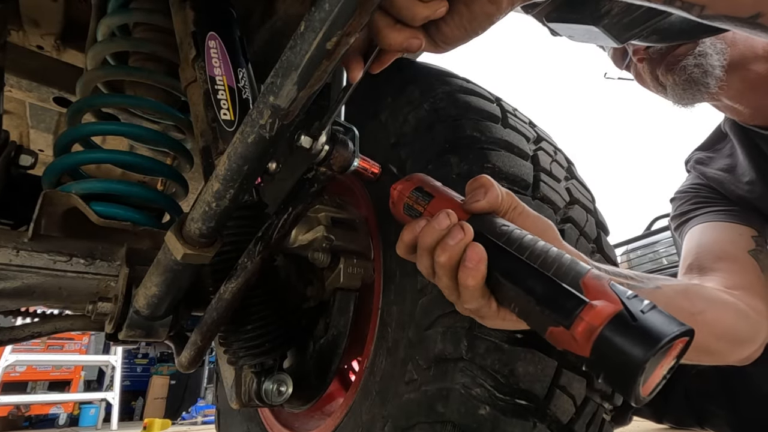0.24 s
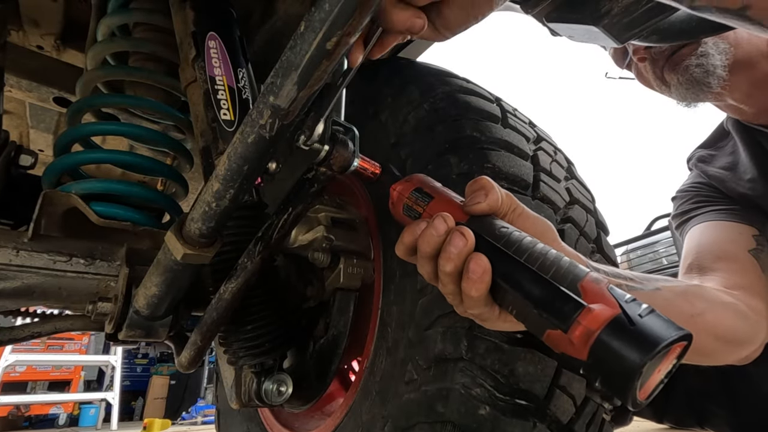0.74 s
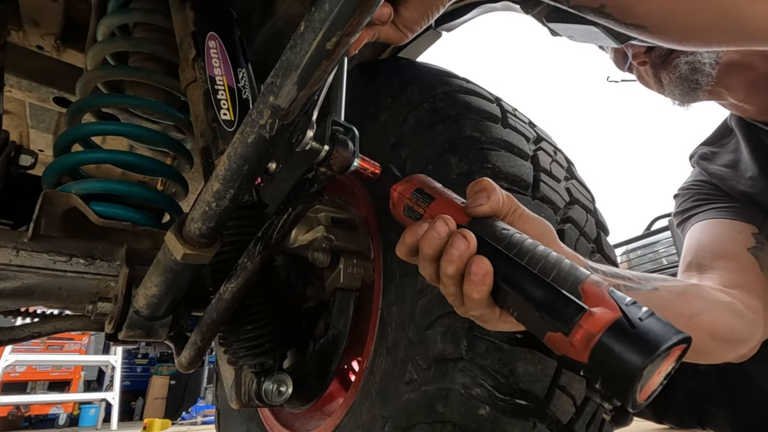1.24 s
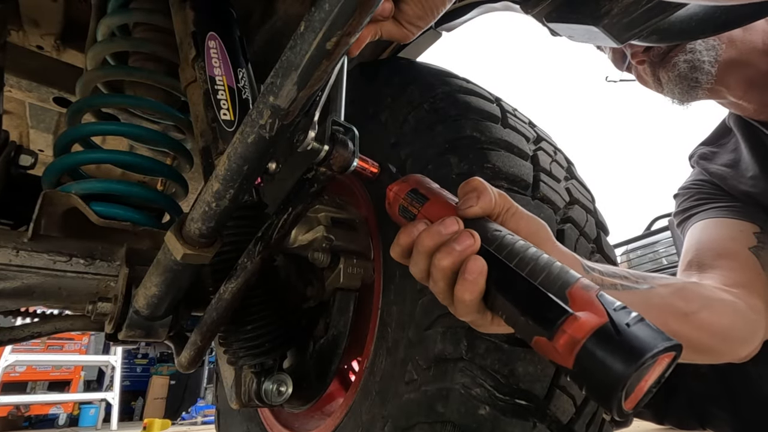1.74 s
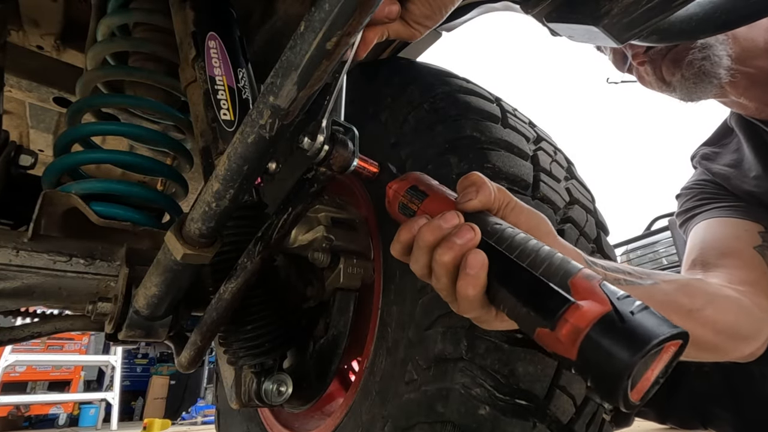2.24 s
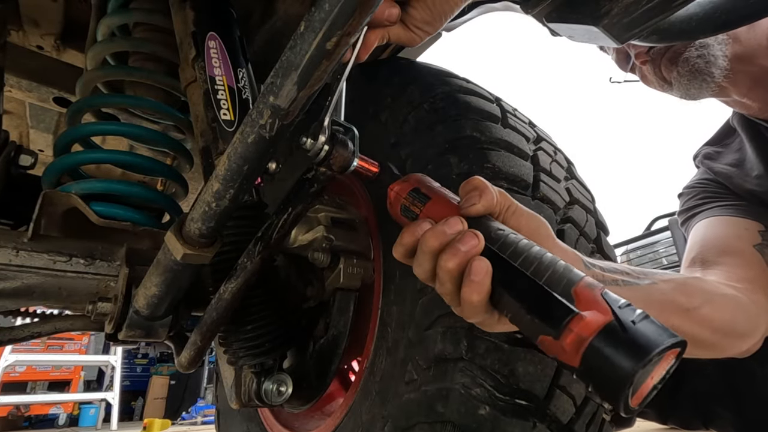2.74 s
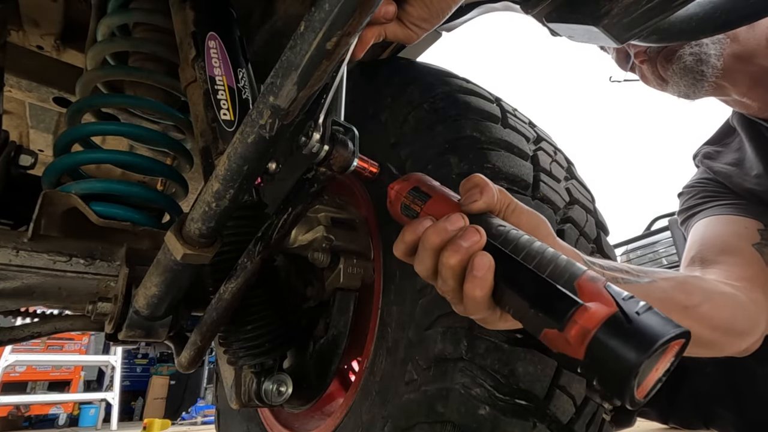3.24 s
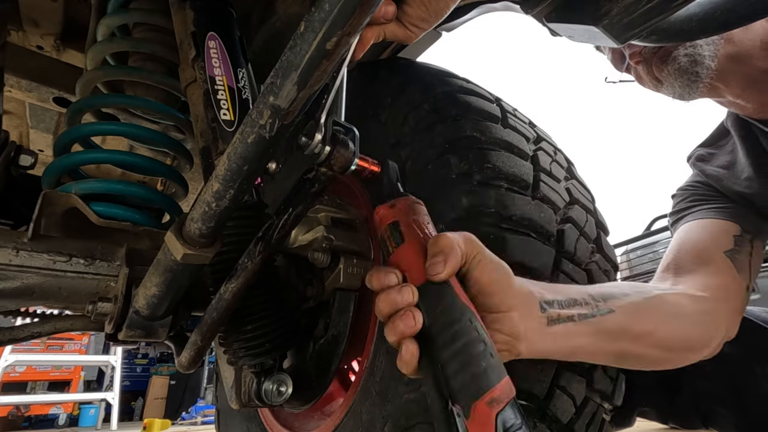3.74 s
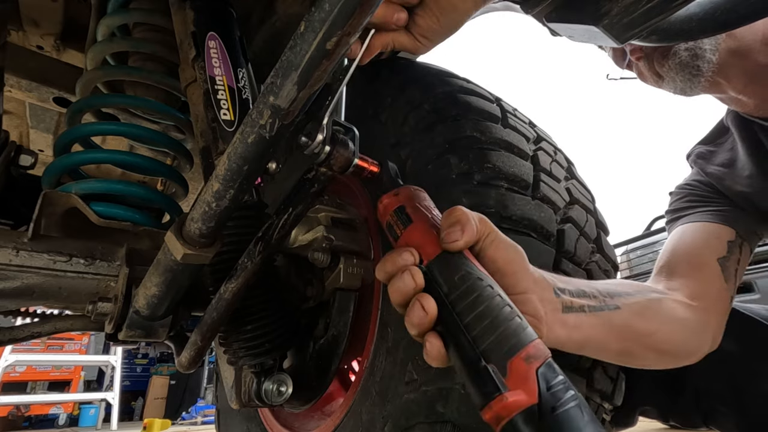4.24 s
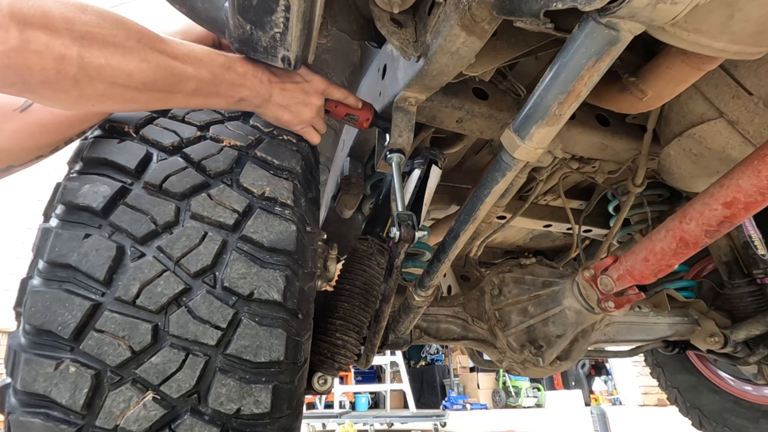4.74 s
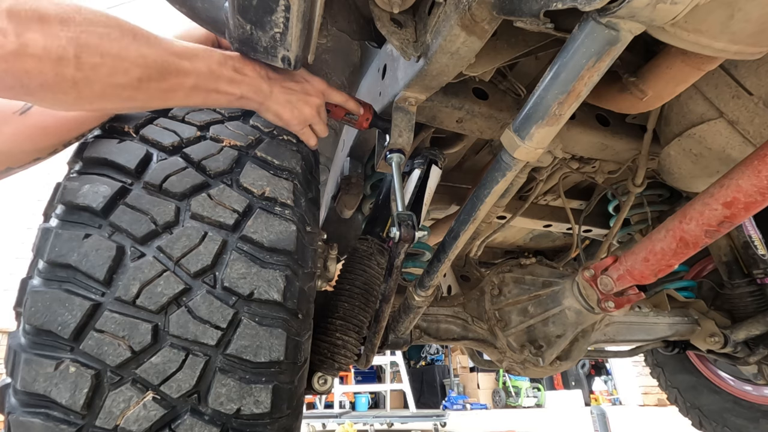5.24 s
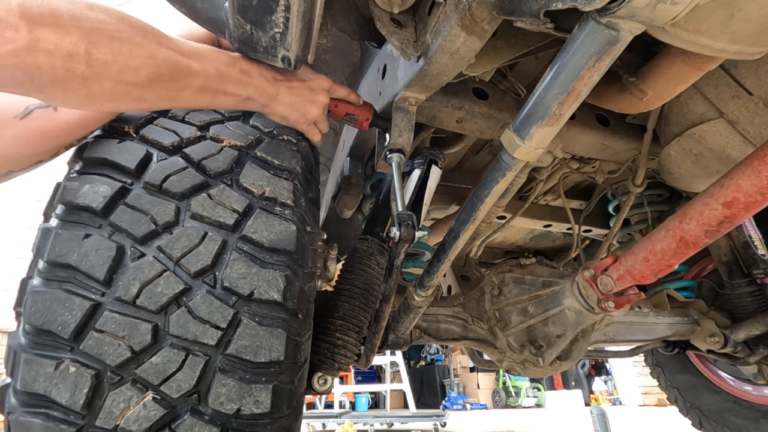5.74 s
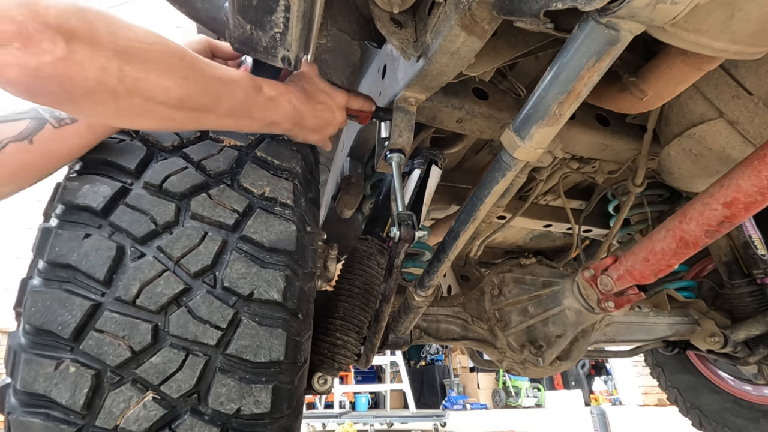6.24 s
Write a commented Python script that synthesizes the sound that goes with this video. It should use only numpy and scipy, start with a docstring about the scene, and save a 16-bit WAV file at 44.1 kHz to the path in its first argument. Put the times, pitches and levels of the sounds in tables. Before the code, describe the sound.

Under a truck, very close, a cordless ratchet already running slows into separate metallic clacks and stops. After a few steel knocks and a scuff it runs long and fast, a buzzing rattle with scraping and ringing, then groans down as the nut tightens. Wind buffets the microphone. The position then changes: an idling engine hums, steel ticks, and a short, rougher run binds and stops.

```python
"""Cordless ratchet under a truck

Close up, an electric ratchet runs nuts down: the first run eases off, the next two slow as the nut comes tight.
Each crank turn strikes a pawl, so timed blows ring through coloured noise; the gears rasp in between.
The socket knocks, scrapes and scuffs on steel, as short noise bursts, resonant noise and wavering tones.
Noise rumbles as wind on the microphone; after a change of position an engine idles some way off,
built from low firing orders, faint whines and a wash of air."""
import sys
import numpy as np
from scipy import signal
from scipy.fft import rfft, irfft, next_fast_len
from scipy.io import wavfile
from scipy.ndimage import uniform_filter1d, map_coordinates

SR = 44100
rng = np.random.default_rng(int(sys.argv[2]) if len(sys.argv) > 2 else 0)


def generate_wav(signal):
    """Clip the signal to [-1, 1] and save it as 16-bit WAV at the path in sys.argv[1]."""
    frames = np.transpose(np.atleast_2d(signal))
    scaled = np.clip(frames, -1, 1) * 32767
    pcm = np.round(scaled).astype(np.int16)
    wavfile.write(sys.argv[1], SR, pcm)


N = 285960
TIME = np.arange(N) / SR
FREE_TURNS = 73  # reference crank speed with no load, turns a second

# crank in the long run: [t/s, speed/turns a second, load of the nut/0-1]
LONG_DRIVE = [(1.57, 34, 0), (1.66, 70, 0), (1.85, 73.7, 0), (3.03, 72.6, 0), (3.45, 70.5, .02),
              (3.56, 57.6, .48), (3.66, 58, .55), (3.76, 40.4, .85), (3.87, 21, .35)]
# the long run: [trigger pulled t/s, last clack t/s, released t/s, gear level/dB at free speed without load,
# drift/dB a second, unloaded chassis growl/dB rel gear, unloaded steel rasp/dB rel gear at free speed]
LONG_RUN = (1.575, 3.838, 3.845, -24, -1.5, -8.8, -8)


def amp(db):
    """Decibels to gain."""
    return 10 ** (np.asarray(db) / 20)


def unit(x):
    """Scaled to rms 1."""
    return x / np.sqrt(np.mean(x ** 2) + 1e-20)


def along(points, hz):
    """Values at hz, read between (f/Hz, value) points on a log frequency axis."""
    f, v = np.transpose(points)
    return np.interp(np.log(hz + 1), np.log(f + 1), v)


def curves(rows):
    """One value per sample for each column after the time."""
    s, *cols = np.transpose(rows)
    return [np.interp(TIME, s, c) for c in cols]


def wobble(rate):
    """A smooth random curve, rate knots a second."""
    coarse = TIME[::32]
    knots = rng.standard_normal(int(N * rate / SR) + 4)
    return np.interp(TIME, coarse, map_coordinates(knots, [coarse * rate]))


def filtered(x, gain):
    """x through a causal minimum-phase filter with the given gain over frequency."""
    n = x.shape[-1]
    m = 2 * next_fast_len(n // 2 + 4096)
    log_gain = np.log(np.maximum(gain(np.fft.rfftfreq(m, 1 / SR)), 1e-6))
    # folding the cepstrum onto positive times makes the filter causal
    cepstrum = irfft(log_gain, m)
    cepstrum[1:m // 2] *= 2
    cepstrum[m // 2 + 1:] = 0
    return irfft(rfft(x, m) * np.exp(rfft(cepstrum)), m)[..., :n]


def zero_phase(x, response):
    """x times a response of frequency."""
    m = next_fast_len(N + SR // 2)
    return irfft(rfft(x, m) * response(np.fft.rfftfreq(m, 1 / SR)), m)[..., :N]


def noise(spectrum):
    """Coloured noise of rms 1."""
    return unit(filtered(rng.standard_normal(N), lambda hz: amp(along(spectrum, hz))))


def narrow(centre_hz, width_hz):
    """Noise of rms 1 ringing in one resonance."""
    gain = lambda f: 1 / (1 + (2 * (f - centre_hz) / width_hz) ** 4)
    return unit(filtered(rng.standard_normal(N), gain))


def steady(x):
    """x with its slow level evened out to about 1, single blows kept."""
    power = uniform_filter1d(uniform_filter1d(x ** 2, size=3000), size=2000)
    return x / np.sqrt(abs(power) + 1e-4 * np.mean(x ** 2))


def shifting(x):
    """x with its colour varied at random in short-lived patches of time and frequency."""
    patch_db = 1.5
    z = signal.stft(x, nperseg=256)[2]
    field = uniform_filter1d(rng.standard_normal(z.shape), size=7, axis=0)
    field = uniform_filter1d(field, size=6, axis=1)
    return signal.istft(z * amp(patch_db * unit(field)), nperseg=256)[1][:len(x)]


def stroke(middle_s, length_s):
    """Gain that swells smoothly to 1 and dies away."""
    return np.cos(np.pi * np.clip((TIME - middle_s) / length_s, -.5, .5)) ** 2


def swell(peak_s, rise_db, fall_db):
    """Gain that rises to 1 and falls again, at so many dB a second."""
    return amp(np.minimum(rise_db * (TIME - peak_s), fall_db * (peak_s - TIME)))


def resonances(modes, hz):
    """Gain of a set of resonances, given as (f/Hz, width/Hz, level/dB)."""
    return amp(sum(db / (1 + (2 * (hz - centre) / width) ** 2) for centre, width, db in modes))


def parts(x, colour, modes):
    """What chassis (low), gear case (middle) and bare steel (high) radiate when x shakes them."""
    below = lambda hz, edge: 1 / (1 + (hz / edge) ** 12)
    low = lambda hz: below(hz, 700)
    middle = lambda hz: below(hz, 3700) - below(hz, 700)
    high = lambda hz: 1 - below(hz, 3700)
    radiated = lambda hz, share: np.sqrt(abs(share(hz))) * amp(along(colour, hz)) * resonances(modes, hz)
    return [filtered(x, lambda hz: radiated(hz, share)) for share in (low, middle, high)]


def wind():
    """Buffeting on the microphone, with a higher flutter in the gusts, over quiet open air."""
    # wind on the microphone: [t/s, buffet level/dB, flutter level/dB before its trim]
    gusts = [(0, -21.5, -29.0), (0.17, -20.5, -26.0), (0.47, -22.0, -36.5), (0.53, -25.5, -26.0),
             (0.69, -28.5, -40.5), (1.06, -30.5, -34.0), (1.13, -36.0, -49.0), (1.29, -31.0, -41.0),
             (1.42, -41.5, -48.5), (1.48, -30.5, -38.0), (1.8, -35.0, -39.0), (1.87, -23.5, -29.5),
             (2.03, -35.5, -38.0), (2.08, -26.5, -33.5), (2.58, -34.0, -38.5), (3.58, -38.0, -43.5),
             (3.79, -25.5, -26.5), (3.91, -30.5, -39.5), (4.32, -36.5, -47.5), (4.64, -27.5, -31.5),
             (4.76, -31.5, -46.5)]
    # spectra of buffet, flutter and open air: [f/Hz, level/dB]
    buffet_colour = [(10, -17), (25, 0.5), (42, 0), (70, -1.5), (110, -4), (160, -30), (450, -110)]
    flutter_colour = [(50, -24), (100, -9), (140, 1.5), (200, -3), (280, -12.5), (420, -23.5), (800, -41),
                      (2000, -110)]
    open_air = [(60, -1.5), (150, -23.5), (400, -27), (1400, -36.5), (4400, -55.5), (7500, -56),
                (9000, -73.5), (14000, -80)]
    flutter_trim_db = -1.5
    buffet_db, flutter_db = curves(gusts)
    buffet = amp(buffet_db + .6 * wobble(11)) * steady(noise(buffet_colour))
    flutter = amp(flutter_db + flutter_trim_db + .6 * wobble(9)) * steady(noise(flutter_colour))
    return buffet + flutter + amp(-40.5) * noise(open_air)


def crank_turns(drive, run):
    """Turns of the crank; the pawl catches at every whole number, one of them at the last clack."""
    start, last_clack = run[:2]
    turns = np.cumsum(curves(drive)[0] * (TIME >= start)) / SR
    return turns + (-np.interp(last_clack, TIME, turns)) % 1


def running(run):
    """Gain of a run: builds after the trigger, holds, dies after release."""
    spin_up_s, run_out_db_per_s = .06, 420
    start, _, stop = run[:3]
    return np.clip((TIME - start) / spin_up_s, 0, 1) * amp(-run_out_db_per_s * np.maximum(TIME - stop, 0))


def effort(drive, run):
    """Speed and a tight nut make the tool louder; load brings more chassis growl and less bare steel."""
    load_db, load_growl_db, load_rasp_db = 6.5, 7.5, -2.5  # at full load
    speed_db, rasp_speed_db = 5.5, 3  # for each doubling of speed
    speed, load = curves(drive)
    start, _, _, gear_db, drift_db, growl_db, rasp_db = run
    doublings = np.log2(speed / FREE_TURNS)
    gear_db = gear_db + drift_db * (TIME - start) + speed_db * doublings + load_db * load
    return gear_db, growl_db + load_growl_db * load, rasp_db + load_rasp_db * load + rasp_speed_db * doublings


def pawl_blows(turns, uneven_db):
    """Impulses at set shares of each crank turn, scattered slightly at random in time and level."""
    # what strikes within one crank turn: [share of the turn, mean level/dB]
    crank = [(0, 0.5), (0.222, -7.5), (.47, -5.5), (0.738, -9)]
    scatter_s = .00013
    whole = np.arange(int(turns[-1]) + 1)
    blows = np.zeros(N)
    for share, db in crank:
        at = np.interp(whole + share, turns, TIME) + scatter_s * rng.standard_normal(len(whole))
        index = np.clip(np.round(at * SR).astype(int), 0, N - 1)
        blows[index] += amp(db + uneven_db * rng.standard_normal(len(whole)))
    return blows


def ratchet(drive, run, colour, modes, mesh_db, rattle_db, ring_s, uneven_db):
    """One run: each crank turn strikes the pawl, every blow rattles the head, and the gears rasp in between."""
    turns = crank_turns(drive, run)
    on = (TIME >= run[0]) & (TIME <= run[2] + .1)
    blows = pawl_blows(turns, uneven_db)[on]
    t = np.arange(SR // 20) / SR
    fade = amp(-60 * t / ring_s) * (1 - np.exp(-t / 0.00036))
    after_blows = lambda hits, tail: signal.fftconvolve(hits, tail)[:len(hits)]
    # two random ringings cross-fade slowly, so the lines come and go
    blend = 1.2 * wobble(6)[on]
    ringing = lambda: after_blows(blows, fade * rng.standard_normal(len(t)))
    ring = unit(np.cos(blend) * ringing() + np.sin(blend) * ringing())
    # loose parts rattle at random under the same decay
    rattle_level = np.sqrt(abs(after_blows(blows ** 2, fade ** 2)))
    rattle = unit(rattle_level * rng.standard_normal(N)[on])
    # the gear rasp pulses 13 times a crank turn
    teeth = (1 + .6 * np.cos(2 * np.pi * 13 * turns[on])) * rng.standard_normal(N)[on]
    shaking = shifting(ring + amp(rattle_db) * rattle + amp(mesh_db) * teeth)
    low, middle, high = parts(shaking, colour, modes)
    gear_db, growl_db, rasp_db = [c[on] for c in effort(drive, run)]
    out = np.zeros(N)
    out[on] = amp(gear_db) * (steady(middle) + amp(growl_db) * steady(low) + amp(rasp_db) * steady(high))
    return running(run) * out


def easing_run():
    """The first run, already turning at the start, eases off until the crank hardly turns."""
    # crank: [t/s, speed/turns a second, load of the nut/0-1]
    drive = [(0, 66, .1), (.12, 46, .15), (.19, 38.4, .1), (.235, 33.5, .4), (.298, 42, .5),
             (.325, 38.2, .05), (.42, 25.5, .05), (.63, 5.5, 0)]
    # trigger, last clack, release and levels, columns as in LONG_RUN
    run = (-.1, .603, .612, -24.7, -4, -12, -2.5)
    # colour of the run: [f/Hz, level/dB]
    colour = [(100, -29), (300, -4), (700, -5), (950, 1), (1650, -4.5), (2050, -.5), (2700, -11.5),
              (3300, -11.5), (4700, -14), (6200, -26), (9500, -33), (12400, -37), (15000, -70)]
    # resonances of the tool and the part it bears on: [f/Hz, width/Hz, level/dB]
    modes = [(930, 200, 4), (1380, 200, 3), (1840, 90, -8), (2080, 300, 5)]
    return ratchet(drive, run, colour, modes, mesh_db=-2.5, rattle_db=3, ring_s=.017, uneven_db=1.3)


def strikes(rows, colour, crack_s, ring_s, ring_db, mode_db, trim_db):
    """Steel on steel: a short crack, then a dense ring; duller contacts rise more slowly and ring more purely."""
    ring_width = .25  # of the ringing band, as a share of its frequency
    out, t = np.zeros(N + SR), np.arange(SR // 4) / SR
    for s, db, thud_db, ping_db, hz in rows:
        mode = [(hz, ring_width * hz, mode_db + max(-ping_db - 12, 0) / 3)]
        rise = crack_s / 40 * amp(-.3 * min(ping_db, 0))
        decay = amp(-60 * t / crack_s) + amp(ring_db - 60 * t / ring_s)
        shape = decay * (1 - np.exp(-t / rise))
        bands = parts(shape * rng.standard_normal(len(t)), colour, mode)
        # each band is levelled by its first few milliseconds
        low, middle, high = [b / np.sqrt(np.mean(b[:SR // 150] ** 2)) for b in bands]
        blow = middle + amp(thud_db) * low + amp(ping_db) * high
        out[round(s * SR):][:len(t)] += amp(db + trim_db) * blow
    return out[:N]


def pawl_clacks():
    """When the crank is slow the pawl clacks singly, each a short steel strike."""
    # single clacks: [t/s, level/dB before trim, thud/dB rel, ping/dB rel, ringing f/Hz]
    clack_rows = [(0.221, -11.5, -14, -14, 2000), (0.25, -10, -14, -15, 2100), (0.276, -18, -12, -1, 4500),
                  (0.302, -9.5, -14, -12, 2000), (0.357, -18, -10, -12, 1000), (0.39, -17, -4, -18, 850),
                  (0.465, -16, -10, -11, 1500), (0.519, -21, -10, -12, 2100), (0.604, -29, -10, -12, 1300),
                  (3.705, -13, -8, -13, 2900), (3.727, -12, -5, -22, 1400), (3.749, -11, -6, -18, 1350),
                  (3.775, -11, -5, -24, 1500), (3.804, -9, -10, -24, 1450), (3.838, -10, -13, -21, 1480),
                  (5.537, -20, -9, 1, 6300), (5.557, -14, 5, -2, 470), (5.579, -16, 0, 3, 6200),
                  (5.924, -21, 8, -8, 350), (5.98, -24, -8, -3, 2100)]
    # colour of a clack: [f/Hz, level/dB]
    colour = [(150, -8), (400, -2), (900, 1), (2000, -1), (3300, -8), (4600, -14), (7000, -25),
              (12000, -38), (15500, -58)]
    return strikes(clack_rows, colour, crack_s=.026, ring_s=.08, ring_db=-14, mode_db=10, trim_db=-12.5)


def steel_knocks():
    """The socket and spanner knock on steel, with a longer ring than the pawl."""
    # knocks: [t/s, level/dB before trim, thud/dB rel, ping/dB rel, ringing f/Hz]
    knock_rows = [(0.786, -43, -4, -24, 850), (0.839, -28, -12, -36, 920), (1.285, -17.5, -12, -18, 930),
                  (1.496, -47, 6.5, -7, 2800), (3.976, -28, -11, -9, 1480), (4.038, -39, -14, -9, 1400),
                  (4.107, -46, -6, -11, 2000), (4.804, -30, -11, -7.5, 1900),
                  (5.354, -35.5, -5.5, -8.5, 1000), (5.436, -26.5, -6, 2, 10500),
                  (6.137, -32, -8, -8, 1300), (6.221, -34.5, -2, -2, 2200), (6.246, -17, -8.5, 5.5, 5200),
                  (6.449, -16.5, -7, -3, 2100), (6.462, -21.5, -3, -16, 1900)]
    # colour of a knock: [f/Hz, level/dB]
    colour = [(150, -9), (280, 4), (700, -3.5), (930, 1.5), (1500, -1), (2100, -8), (2800, -14.5),
              (3600, -17.5), (5500, -20.5), (7500, -23), (10000, -37), (13000, -47), (15500, -62)]
    return strikes(knock_rows, colour, crack_s=0.036, ring_s=0.13, ring_db=-9.5, mode_db=9, trim_db=-8)


def scuffs():
    """Short gritty slides of the socket on the nut, as coloured noise with a random flicker."""
    # slides: [middle t/s, length/s, level/dB at the middle]
    slides = [(0.803, 0.07, -47), (1.31, 0.16, -43), (3.977, 0.14, -47), (4.447, 0.12, -55)]
    # colour of the slides: [f/Hz, level/dB]
    colour = [(300, -20), (1000, 6.5), (1900, -10), (3400, -14), (9000, -40)]
    strokes = sum(amp(db) * stroke(s, length) for s, length, db in slides)
    return strokes * unit(amp(2.6 * wobble(150)) * noise(colour))


def drive_whine(switch_hz, glide_hz_per_s):
    """Chopped current sings faintly in the windings, and a second tone glides up as the rotor breaks free."""
    # whine around the trigger pull: [start t/s, end t/s, level/dB of the main winding tone]
    trigger = [(1.549, 1.6, -57), (5.47, 5.54, -60)]
    out = np.zeros(N)
    for start, end, db in trigger:
        t = TIME - start
        chop = 2 * np.pi * switch_hz * t
        rotor = 2 * np.pi * (switch_hz + glide_hz_per_s * t / 2) * t
        tone = np.sin(2 * chop) + np.sin(3 * chop) / 6 + 2 * np.sin(rotor)
        out += amp(db) * np.clip(np.minimum(t, end - TIME) / .012, 0, 1) * tone
    return out


def free_running():
    """In the long run the crank hums, and the socket scrapes on the nut, ringing in its steel modes."""
    # hum: [multiple of the crank speed, level/dB at the height of the swell]
    crank_orders = [(2, -42), (3, -34.5), (5, -41), (7, -39), (8, -38), (9, -38), (12, -36), (13, -35)]
    # socket modes, swelling and fading as it shifts on the nut:
    # [f/Hz, width/Hz, level/dB at its loudest, loudest t/s, rise/dB a second, fall/dB a second]
    socket = [(3050, 900, -31.5, 1.8, 5, 14), (4250, 1400, -29.5, 2.84, 14, 70),
              (12550, 1800, -38, 2.95, 18, 3)]
    # the socket catches on the nut and its lowest mode flares up: [t/s, level/dB]
    catches = [(2.13, -26), (2.25, -22.5), (2.34, -26), (2.48, -24.5), (2.58, -26), (2.745, -22),
               (2.89, -28), (2.975, -23), (3.1, -22.5), (3.32, -27)]
    catch_s, catch_hz = .135, 935
    angle = 2 * np.pi * crank_turns(LONG_DRIVE, LONG_RUN)
    wavering = lambda k: amp(4 * wobble(14)) * np.sin(round(k) * angle + 1.1 * wobble(55))
    hum = swell(peak_s=2.2, rise_db=35, fall_db=8) * sum(amp(db) * wavering(k) for k, db in crank_orders)
    throb = 1 + 0.65 * np.cos(angle)  # once a crank turn
    scrape = np.zeros(N)
    for hz, width_hz, db, s, rise_db, fall_db in socket:
        mode = unit(amp(2 * wobble(60)) * throb * narrow(hz, width_hz))
        scrape += amp(db) * swell(s, rise_db, fall_db) * mode
    flares = sum(amp(db) * stroke(s, catch_s) for s, db in catches)
    catch_tone = np.sin(2 * np.pi * catch_hz * TIME + 1.05 * wobble(85))
    ring = flares * catch_tone * throb * amp(-1.5 + 2.2 * wobble(130))
    return (hum + scrape + ring) * running(LONG_RUN) * curves(LONG_DRIVE)[0] / FREE_TURNS


def long_run():
    """The second run spins freely, then slows as the nut comes tight."""
    # colour of the run: [f/Hz, level/dB]
    colour = [(50, -14), (200, -6), (270, -11), (400, -2.5), (720, -1), (1300, 0), (1750, -2.5), (2500, -4),
              (3200, -2.5), (4400, -23), (5500, -12.5), (9500, -21), (11300, -26.5), (13000, -34),
              (15500, -41.5)]
    # resonances of the tool and the part it bears on: [f/Hz, width/Hz, level/dB]
    modes = [(1420, 200, 2), (1630, 120, -4), (9600, 800, 6.5)]
    return ratchet(LONG_DRIVE, LONG_RUN, colour, modes, mesh_db=-1, rattle_db=-1, ring_s=0.03, uneven_db=1.6)


def groan():
    """As the nut comes tight in the long run, the load shakes the suspension and the thread grinds down to a thud."""
    # suspension resonances: [f/Hz, width/Hz, level/dB at full load]
    suspension = [(355, 35, -29.5), (985, 35, -33), (1290, 45, -31), (1460, 65, -30.5)]
    # the thread grinds lower as it binds: [t/s, f/Hz, level/dB before the load gain]
    thread = [(3.5, 880, -42), (3.665, 740, -32), (3.695, 480, -27.5), (3.75, 290, -27.5), (3.87, 215, -31)]
    load = curves(LONG_DRIVE)[1]
    chassis = sum(amp(db) * steady(narrow(hz, width_hz)) for hz, width_hz, db in suspension)
    grind_hz, grind_db = curves(thread)
    phase = 2 * np.pi * np.cumsum(grind_hz) / SR
    # two random curves spread the gliding tone into a rough band
    grind = amp(grind_db) * steady(wobble(330) * np.sin(phase) + wobble(330) * np.cos(phase))
    return running(LONG_RUN) * (load * chassis + np.minimum(2 * load, 1) * grind)


def engine():
    """An idling engine: low firing orders, faint whines and a wash of air."""
    # idle speed: [t/s, mean rate/firings a second]
    idle = [(5.1, 39.3), (5.6, 38.2), (6.2, 37.6)]
    # firing orders: [multiple of the firing rate, mean level/dB rms]
    orders = [(1, -37.5), (2, -36), (3, -42.5), (4, -48.5), (5, -40), (6, -53)]
    # engine accessories: [mean f/Hz, mean level/dB rms]
    accessories = [(958, -57), (1230, -59), (1690, -55.5), (5580, -71)]
    # engine bay wash: [f/Hz, level/dB]
    wash = [(15, -45.5), (25, -13.5), (77, -3.5), (196, -8), (250, -30), (480, -29), (1600, -33.5),
            (2300, -35.5), (7400, -50), (11500, -65), (15000, -90)]
    firings = np.cumsum(curves(idle)[0] * (1 + .008 * wobble(8))) / SR
    drone, whine = np.zeros(N), np.zeros(N)
    for k, db in orders:
        drone += amp(db + 1.7 * wobble(7)) * np.sin(2 * np.pi * (round(k) * firings + rng.random()))
    for hz, db in accessories:
        cycles = np.cumsum(hz * (1 + .005 * wobble(30))) / SR
        whine += amp(db + 1 * wobble(13)) * np.sin(2 * np.pi * cycles)
    return np.sqrt(2) * (drone + whine) + amp(-33.5) * noise(wash)


def short_run():
    """The last run slows as its nut comes tight, under load from the start."""
    # crank: [t/s, speed/turns a second, load of the nut/0-1]
    drive = [(5.51, 50, .5), (5.565, 47, .9), (5.63, 61.5, .5), (5.86, 64.5, .45), (5.91, 46, .65),
             (5.95, 21, .95), (6.03, 9.3, .7)]
    # trigger, last clack, release and levels, columns as in LONG_RUN
    run = (5.538, 5.98, 5.975, -26.3, -1.5, -5, -.3)
    # colour of the run: [f/Hz, level/dB]
    colour = [(60, -17.5), (200, -5), (350, -2), (520, -4), (760, -5), (1300, -7), (2000, -10), (2850, -18),
              (4400, -15), (7700, -13.5), (9500, -22), (12300, -25), (14000, -35), (15500, -55)]
    # resonances of the tool and the part it bears on: [f/Hz, width/Hz, level/dB]
    modes = [(250, 22, 6), (346, 25, 6), (462, 45, 5), (655, 28, 7), (740, 100, -9), (870, 120, 3),
             (2030, 130, 3), (4380, 150, 4)]
    return ratchet(drive, run, colour, modes, mesh_db=-2.5, rattle_db=-2, ring_s=0.03, uneven_db=1.5)


def underbody(x):
    """The close echo between chassis, wheel and ground: a noise tail that decays at its own rate in each band."""
    # decay of the echo: [f/Hz, t60/s]
    decay = [(150, .25), (400, 0.42), (800, 0.2), (3000, 0.12), (7000, 0.078), (14000, 0.089)]
    hz, t, z = signal.stft(rng.standard_normal(SR // 2), SR, nperseg=256)
    tail = signal.istft(z * amp(-60 * t / along(decay, hz)[:, None]), SR, nperseg=256)[1]
    delayed = np.pad(x, (SR // 300, 0))
    return signal.fftconvolve(delayed, tail / np.linalg.norm(tail))[:N]


def wandering_tail(x):
    """x through a short noise tail with randomly wandering phase, used to widen the stereo."""
    tail_s = .04  # t60
    t = np.arange(SR // 20) / SR
    tail = amp(-60 * t / tail_s) * rng.standard_normal(len(t))
    smeared = signal.fftconvolve(x, tail / np.linalg.norm(tail))[:N]
    return np.real(signal.hilbert(smeared, next_fast_len(N))[:N] * np.exp(2j * wobble(25)))


def ports(mid, moved):
    """A noise tail of opposite sign widens the two ports; from the second position the right port hears first."""
    # level of the widening tail at the first and second position: [f/Hz, side level/dB]
    width_first = [(1300, -45), (4400, -32), (9000, -26), (11000, -11), (12600, -1.5)]
    width_second = [(200, -27), (480, -18), (1200, -12), (2300, -3.5), (4200, -8), (7500, -22),
                    (13000, -11)]
    lag_s, lean = .000014, .045
    spread = wandering_tail(mid)
    first = zero_phase(spread, lambda hz: amp(along(width_first, hz)))
    offset = zero_phase(mid, lambda hz: lean + 1j * np.sin(np.pi * hz * lag_s))
    second = zero_phase(spread, lambda hz: amp(along(width_second, hz))) - offset
    side = (1 - moved) * first + moved * second
    return np.array([mid + side, mid - side])


def scene():
    """The tool in its echo, over wind and then the engine, heard by two close ports."""
    move_s = 4.776
    moved = np.clip((TIME - move_s) * 500, 0, 1)  # from 0 to 1 in 2 ms
    around = scuffs() + (1 - moved) * wind() + moved * engine()
    runs = easing_run() + long_run() + short_run()
    runs += free_running() + groan() + drive_whine(switch_hz=1850, glide_hz_per_s=4500)
    clacks, knocks = pawl_clacks(), steel_knocks()
    # tool and knocks echo under the chassis
    echo = amp(-10) * underbody(runs) + amp(-8) * underbody(clacks / 2 + knocks)
    return ports(around + runs + clacks + knocks + echo, moved)


def record(dry):
    """The recorder keeps nothing above its band limit."""
    top_hz = 15750
    return zero_phase(dry, lambda hz: hz < top_hz)


dry = scene()
out = record(dry)
generate_wav(out)
```